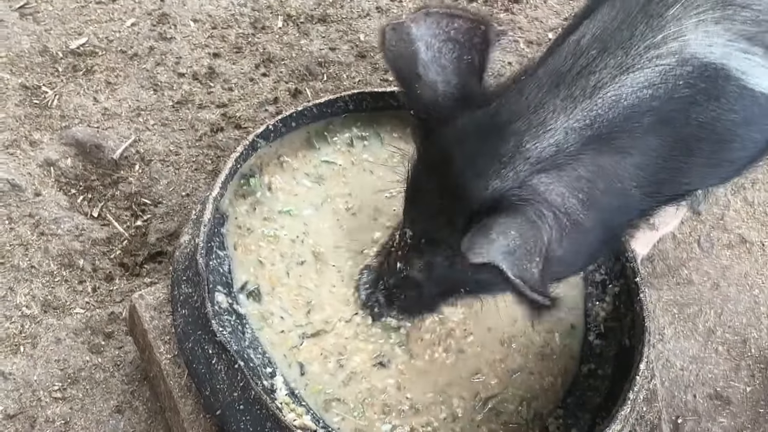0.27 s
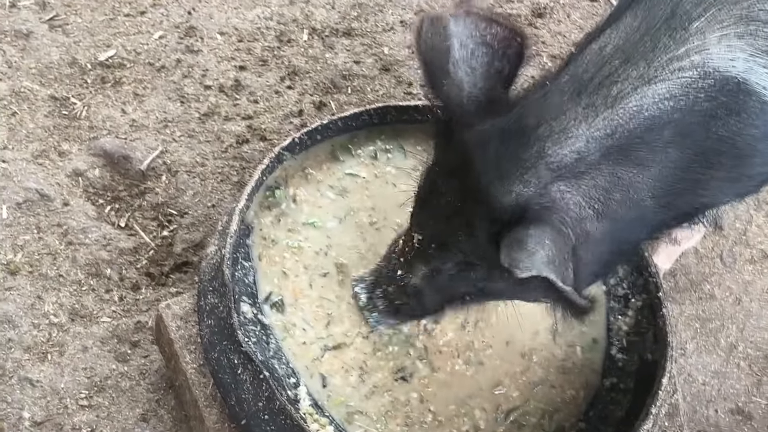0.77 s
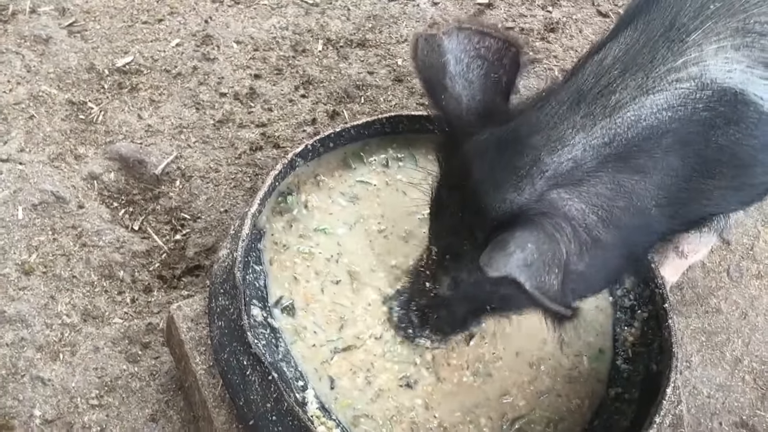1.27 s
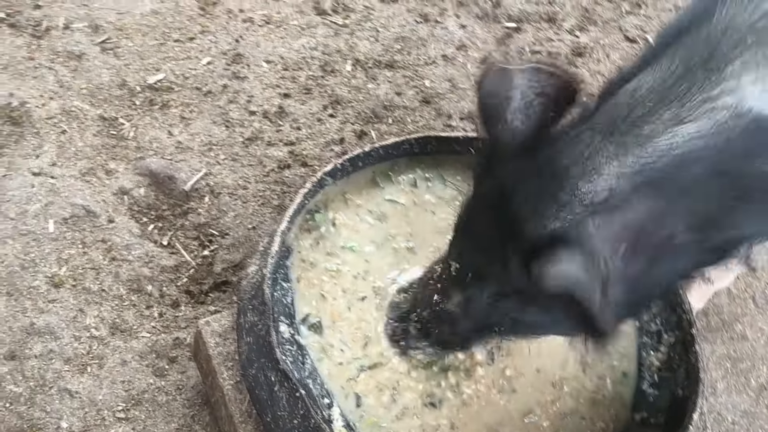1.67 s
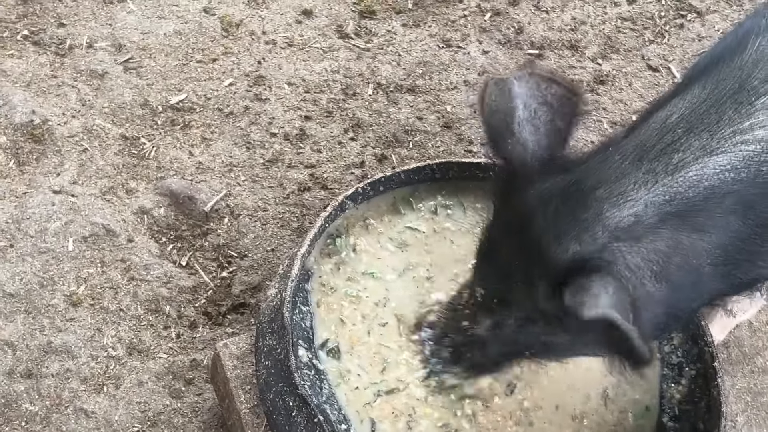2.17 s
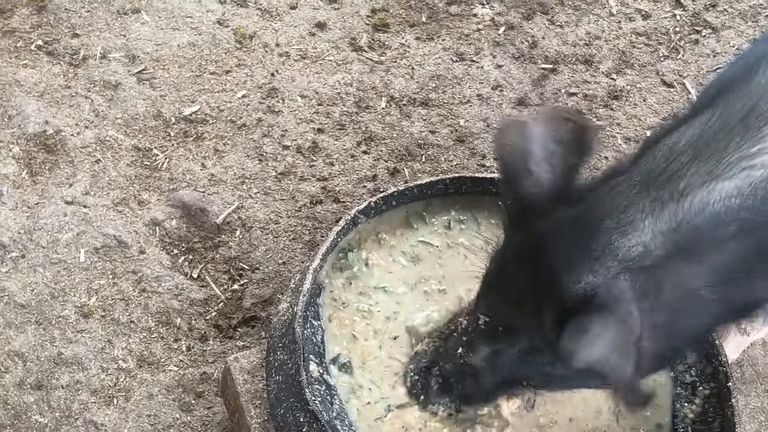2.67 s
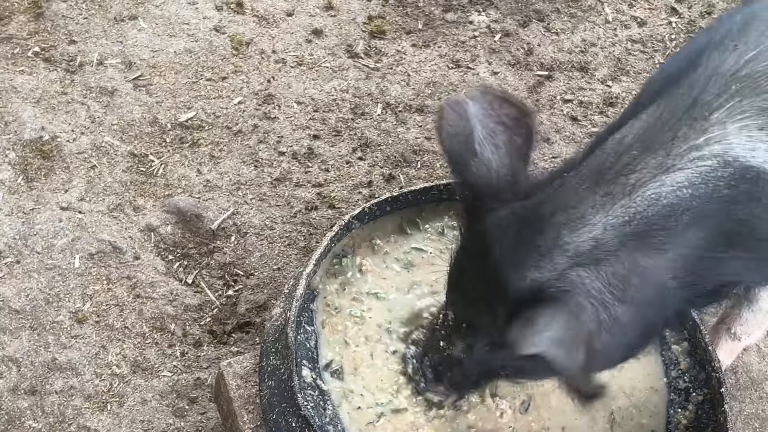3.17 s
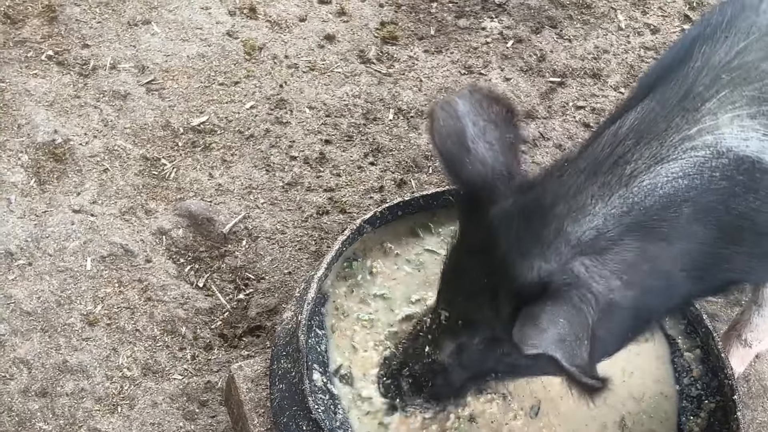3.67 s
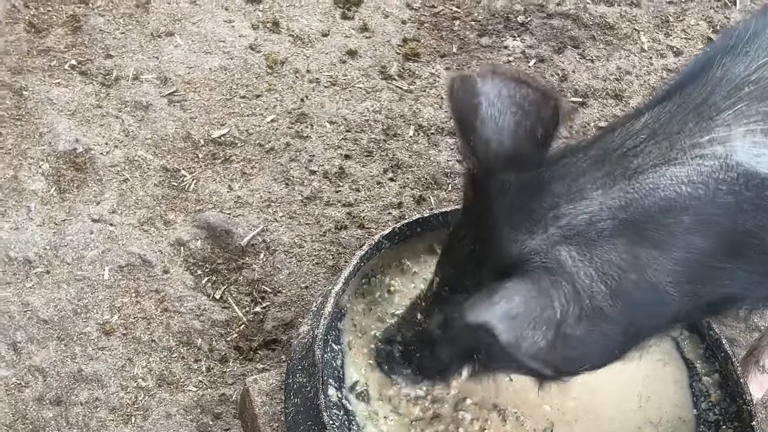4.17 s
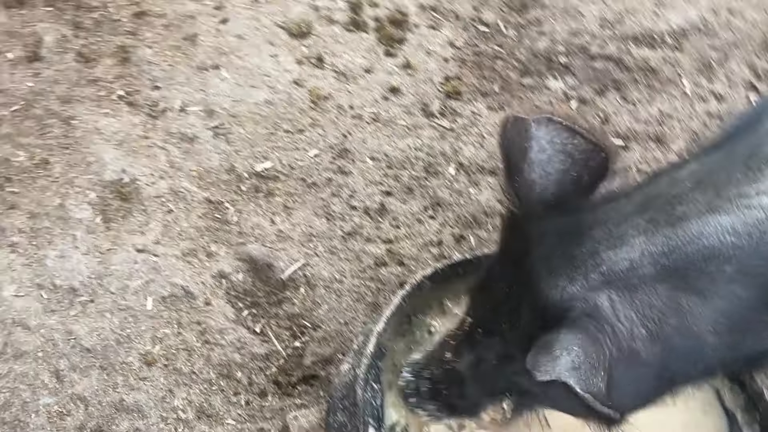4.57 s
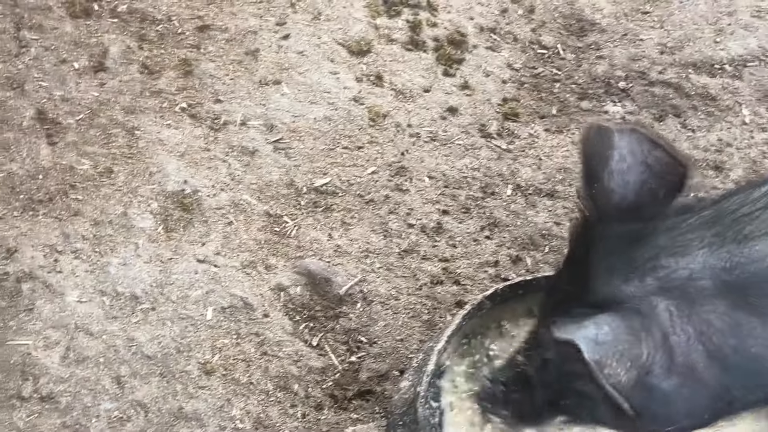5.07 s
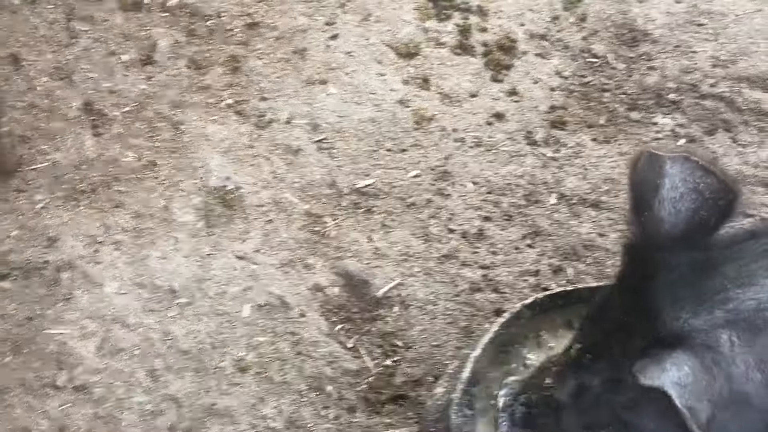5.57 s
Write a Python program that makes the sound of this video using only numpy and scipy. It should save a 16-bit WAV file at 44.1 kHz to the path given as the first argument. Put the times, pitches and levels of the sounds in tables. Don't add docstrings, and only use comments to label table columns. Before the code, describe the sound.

A pig eats soupy mash from a bowl very close to a phone microphone outdoors. About four irregular bites a second give crisp lip ticks, low glugs, bubble pops and fine fizz, strongest near 2.8 seconds. Soft slurps and liquid stirring fill the gaps. A very high cricket chirps faintly over a low, quiet farmyard wash. Later bites thin out after five seconds.

```python
import sys
import numpy as np
from scipy import signal
from scipy.fft import rfft, irfft, next_fast_len
from scipy.io import wavfile
from scipy.ndimage import uniform_filter1d

SR = 44100
rng = np.random.default_rng(int(sys.argv[2]) if len(sys.argv) > 2 else 0)


def wav_out(sig):
    wavfile.write(sys.argv[1], SR, np.round(np.clip(np.atleast_2d(sig).T, -1, 1) * 32767).astype(np.int16))


def convert_level_to_amplitude(level_db):
    exponent = np.asarray(level_db, float) / 20
    return 10 ** exponent


N = 255763


def evened(x):
    return x / np.sqrt(np.mean(x ** 2) + 1e-20)


def read(points, hz):
    f, value = np.transpose(points)
    return np.interp(np.log(hz + 1), np.log(f + 1), value)


def add(mix, s, sound):
    part = mix[max(round(s * SR), 0):][:len(sound)]
    part += sound[:len(part)]


def colour(x, points):
    size = next_fast_len(len(x))
    gain = convert_level_to_amplitude(read(points, np.fft.rfftfreq(size, 1 / SR)))
    return evened(irfft(rfft(x, size) * gain, size)[:len(x)])


def resonate(x, hz, width):
    turn = np.exp(2j * np.pi * np.cumsum(hz * np.ones(len(x))) / SR)
    r = np.exp(-np.pi * width / SR)
    return 2 * (turn * signal.lfilter([1 - r], [1, -r], x / turn)).real


def swell(u, sharp=1.4):
    return (u * np.exp(1 - u)) ** sharp


def ragged(depth_db, seconds):
    span = int(seconds * SR)
    drift = uniform_filter1d(uniform_filter1d(rng.standard_normal(N), span), span)
    return evened(convert_level_to_amplitude(depth_db * np.tanh(evened(drift))))


def lasting(rows, cycles):
    return [(s, db, hz, cycles * 1e3 / hz) for s, db, hz in rows]


def bubbles(rows, rise, glide, rough, push_db, reach, gain_db):
    out, chance = np.zeros(N), rng.standard_normal((len(rows), 4000))
    for (s, db, hz, ms), c in zip(rows, chance):
        top = rise * ms / 1000
        u = np.arange(int(min(6 * top * SR, 4000))) / SR / top
        cycle = max(int(SR / hz), 2)
        wobble = np.sqrt(cycle) * uniform_filter1d(c[:len(u) + cycle], cycle)[:len(u)]
        wobble = wobble - np.sum(swell(u) * wobble) / np.sum(swell(u))
        turns = np.cumsum(hz * (1 + glide * (np.minimum(u, 4) - 1) + rough * wobble)) / SR
        ring = swell(u, 1.82) * np.sin(2 * np.pi * turns + 9 * c[0])
        throb = np.sqrt(2 * cycle) * uniform_filter1d(c[::-1][:len(u)], 2 * cycle)
        ring = ring * convert_level_to_amplitude(14 * rough * np.tanh(throb))
        lower = 2 * np.pi * (0.72 + 0.1 * np.tanh(c[2]))
        push = convert_level_to_amplitude(push_db) * swell(turns / reach, 16) * np.sin(lower * turns + 9 * c[1])
        level = swell(u) * np.sum(ring + push) / np.sum(swell(u))
        add(out, s - top, convert_level_to_amplitude(db + gain_db) * (ring + push - level))
    return out


# loudest moment in seconds, peak in dB, pitch in Hz, length in ms.
GLUG_POCKETS = [(0.1604, -25.5, 965, 5.9), (0.1669, -23.5, 633, 5.5), (0.8355, -25.5, 690, 1.7),
                (0.8483, -20, 900, 1.36), (1.4527, -27.5, 756, 2.95), (1.4578, -28, 590, 2.3),
                (1.6566, -22.5, 800, 3.34), (1.8667, -29, 820, 2.95), (1.8732, -34.5, 587, 5.8),
                (2.1442, -22, 776, 2.6), (2.1505, -27, 876, 6), (2.437, -24, 667, 1),
                (2.4541, -30.5, 717, 8), (2.5712, -31, 850, 3.2), (2.5876, -35, 710, 3.6),
                (2.6366, -22, 542, 3.9), (2.6482, -27.5, 787, 5.6), (2.794, -32, 890, 6.6),
                (2.8379, -21, 786, 5.1), (2.8484, -19.5, 588, 8.2), (3.1137, -36, 670, 12.5),
                (3.3469, -23.5, 674, 2), (3.5679, -26.5, 696, 3.46), (3.7714, -19, 565, 3.06),
                (4.0042, -29, 690, 4.8), (4.0185, -30, 408, 4.3), (4.2369, -31, 647, 4.9),
                (4.6563, -37, 650, 5.2), (4.8464, -36.5, 475, 4.2), (5.0104, -24.5, 492, 3.7)]


def glugs():
    pockets = bubbles(GLUG_POCKETS, rise=.595, glide=.022, rough=.21, push_db=-14.5, reach=2.83, gain_db=1)
    return signal.sosfilt(signal.butter(2, 190, "high", fs=SR, output="sos"), pockets)


# loudest moment in seconds, peak in dB, pitch in Hz.
SWALLOWS = [(0.642, -45, 159), (0.8813, -45.5, 170), (1.468, -47, 169), (1.606, -52, 96),
            (1.4632, -31, 600), (1.6628, -33.5, 630), (1.8177, -34, 990), (2.9453, -43, 166),
            (3.1492, -34.5, 640), (3.25, -45, 194), (4.1306, -41.5, 148), (4.17, -45, 115),
            (4.1861, -30, 930), (4.3976, -33.5, 900), (4.6378, -34.5, 690), (5.128, -39.5, 467),
            (5.2626, -44, 125)]


def gulps():
    return bubbles(lasting(SWALLOWS, 2.03), rise=.554, glide=-.04, rough=.15, push_db=-10, reach=2.4,
                   gain_db=-.5)


# loudest moment in seconds, peak in dB, pitch in Hz, length in ms.
SMALL_POPS = [(0.1709, -27, 2720, 1.6), (0.3936, -29.5, 2900, 3.4), (0.3937, -30.5, 3560, 4.5),
              (1.0783, -29, 1650, 4.34), (1.3946, -24.5, 2680, 1.3), (1.5873, -29.5, 3380, 1.5),
              (2.0829, -36, 3260, 1.4), (2.0854, -25.5, 1450, 1.15), (2.1453, -32, 3440, 4.9),
              (2.3739, -34.5, 1820, 2.4), (2.5956, -31, 1390, 3.6), (2.8535, -14, 2060, 3.7),
              (3.0592, -29, 3240, 2.5), (3.1028, -35.5, 1670, 4.5), (3.508, -32, 2070, 3.3),
              (3.8063, -27.5, 3330, 1.7), (3.9496, -35, 1860, 3.6), (3.9848, -35.5, 1430, 3.7),
              (4.1749, -32.5, 3440, 2.1), (4.1778, -34.5, 2910, 3.1), (4.1963, -34.5, 3080, 2.6),
              (4.2191, -34, 1840, 2.6), (4.259, -32.5, 2670, 2.4), (4.5656, -36, 1840, 4),
              (4.944, -32, 1870, 2.45), (4.9727, -35, 1730, 3.3), (5.258, -29, 2670, 2.6),
              (5.259, -25, 1800, 2.9)]
# loudest moment in seconds, peak in dB, pitch in Hz.
TONGUE_CLICKS = [(0.1419, -29.5, 4570), (0.176, -27, 4070), (0.4278, -29.5, 4410), (1.079, -24.5, 4560),
                 (1.1512, -32.5, 4200), (1.4378, -36, 4500), (1.4451, -26.5, 4520), (1.4636, -30.5, 4570),
                 (1.6631, -20, 4160), (1.6693, -26, 4200), (1.8166, -36.5, 3900), (1.8739, -34, 4100),
                 (1.9247, -31, 3980), (2.1464, -28, 4400), (2.4519, -30.5, 4570), (2.597, -27, 4290),
                 (2.6529, -31, 4400), (2.7788, -40, 3700), (2.8379, -22.5, 4230), (2.8463, -23, 3870),
                 (3.3451, -19.5, 4260), (3.5664, -22.5, 4420), (3.5748, -23, 3940), (3.7693, -30, 3650),
                 (3.8654, -29, 3900), (4.6491, -24.5, 3660), (4.9027, -34, 4630), (4.9125, -34, 3840),
                 (5.0101, -31, 3800), (5.3293, -30, 4300)]
# loudest moment in seconds, peak in dB, pitch in Hz.
LIP_SNAPS = [(0.1607, -36, 5570), (0.1821, -28.5, 5200), (.184, -25, 9800), (0.8475, -28, 5900),
             (1.1066, -33.5, 5600), (2.4432, -31, 5570), (2.4522, -36, 5740), (2.464, -25, 7740),
             (2.8376, -27, 5740), (2.8528, -18.5, 5500), (3.2751, -36.5, 6000), (3.5668, -26.5, 5500),
             (4.6489, -24, 8850), (5.1951, -34, 4050), (5.6073, -39, 4610)]


def small_bursts():
    return SMALL_POPS + lasting(TONGUE_CLICKS, 8.75) + lasting(LIP_SNAPS, 10.2)


# loudest moment in seconds, peak in dB, pitch in Hz.
SETTLING_BLOPS = [(0.441, -41, 850), (0.7601, -40.5, 786), (1.4879, -43.0, 600), (1.5878, -39, 860),
                  (1.888, -37, 740), (1.8945, -35, 800), (2.5954, -34, 840), (2.648, -28.5, 1220),
                  (2.9304, -44, 423), (3.1708, -43, 563), (3.7735, -30.5, 410), (3.8037, -35.5, 630),
                  (4.8599, -39.5, 876), (5.1276, -44, 1200), (5.1897, -44, 860)]
# loudest moment in seconds, peak in dB, pitch in Hz.
BURSTING_DROPLETS = [(0.1174, -39, 1870), (0.1426, -33, 3040), (0.4365, -31, 3750), (0.449, -34, 2970),
                     (0.8481, -31, 4770), (0.8689, -37, 2790), (1.0997, -30, 4560), (1.1066, -29, 3960),
                     (1.4373, -33, 3530), (1.4516, -37, 5910), (1.4551, -31.5, 1770), (1.6082, -37.0, 3200),
                     (1.6635, -18.5, 3540), (1.6479, -30, 4340), (1.6695, -26, 6270), (1.8534, -43, 3430),
                     (1.8538, -33, 2070), (1.8583, -35, 5830), (1.9057, -38, 4130), (1.9302, -35, 2780),
                     (2.1348, -28, 4400), (2.443, -32, 4540), (2.5014, -42, 2070), (2.5333, -36, 2000),
                     (2.5796, -32, 3640), (2.6052, -36, 4310), (2.6099, -35, 1370), (2.6351, -37, 4250),
                     (2.6355, -45, 2500), (2.656, -36, 3040), (2.7267, -33.5, 3670), (2.8381, -24, 2950),
                     (2.864, -27, 3960), (3.0614, -36.0, 1810), (3.1059, -31, 6400), (3.1258, -35, 1680),
                     (3.1405, -37.0, 5170), (3.4982, -35, 3620), (3.5474, -35, 3200), (3.577, -29.5, 3100),
                     (3.7595, -32, 3680), (3.939, -34, 2990), (4.1662, -34, 3330), (4.2335, -42, 2760),
                     (4.6375, -28, 3300), (4.9054, -32, 2640), (5.028, -36.0, 3960), (5.0304, -34, 1940)]
# loudest moment in seconds, peak in dB, pitch in Hz.
SPIT_THREADS = [(0.1419, -36, 6980), (0.1558, -37, 7580), (0.1634, -34.0, 8010), (0.1711, -28.0, 8100),
                (0.1841, -24, 10900), (0.4279, -32, 7030), (0.4368, -32.0, 11970), (0.4377, -42, 8010),
                (0.823, -34, 6900), (1.0772, -34, 10510), (1.0959, -33, 8270), (1.4522, -28, 7400),
                (1.5869, -28, 14210), (1.5869, -28.5, 7140), (1.6553, -25, 7320), (1.6561, -30, 11020),
                (2.1346, -28.0, 10000), (2.398, -33, 8700), (2.4424, -28.0, 7440), (2.4709, -38, 7550),
                (2.6355, -29, 10940), (2.8412, -32.0, 13700), (3.1026, -34, 8360), (3.1107, -32, 6600),
                (3.5668, -24, 12830), (3.5724, -21.5, 11100), (3.7705, -26, 14600), (3.8661, -29.5, 8100),
                (3.9831, -30, 7920), (4.2402, -30, 9500), (4.6375, -26, 9550), (4.9032, -34, 10160),
                (5.0084, -36, 9700)]


def fine_bursts():
    return lasting(SETTLING_BLOPS, 4.06) + lasting(BURSTING_DROPLETS, 6.72) + lasting(SPIT_THREADS, 13)


# start in seconds, peak in dB, length in ms, level of the top octave in dB.
LIP_TICKS = [(0.1702, -22, 1, 1), (0.1814, -33, 1.8, -10), (0.4267, -17, 2.9, 5), (1.0763, -20, 1.1, -6),
             (1.4363, -24, 1.4, -7), (1.4432, -20.5, 1, -21), (1.5863, -22, 0.29, -31),
             (1.6527, -25, 6.3, 1), (1.6685, -25, 2.6, -21), (1.8574, -24.5, 1.1, 2), (2.1333, -22, 1.5, 1),
             (2.1442, -25, 1.9, 0), (2.4405, -28, 1.6, -8), (2.6305, -22, 1, -3), (2.634, -21.5, 1.5, -1),
             (2.8357, -20.5, 1.6, -16), (2.8372, -31, 0.64, -8), (2.845, -25, 2.3, -12),
             (3.1048, -32, 0.8, -17), (3.344, -16.5, 2.8, -0.5), (3.5656, -24, 1.15, 12),
             (3.571, -25, 2.2, 3), (3.769, -19.5, 2.3, -4), (3.8652, -39, 1.7, -23),
             (3.9825, -30, 2.1, -25), (4.227, -17.5, 2.2, 9), (4.2596, -22.5, 3.3, -8),
             (4.6487, -25, 0.64, -14)]
# start in seconds, peak in dB.
SPIT_FLECKS = [(0.1417, -37), (0.8217, -32), (1.139, -29), (1.928, -35), (2.397, -33), (3.0442, -32),
               (4.5324, -33), (4.9023, -36.5), (5.01, -30), (5.2326, -37), (5.6053, -32)]


def ticks():
    out, t = np.zeros(N), np.arange(700) / SR
    fleck_ms, fleck_top_db = 1.6, -12
    rows = LIP_TICKS + [(s, db, fleck_ms, fleck_top_db) for s, db in SPIT_FLECKS]
    for (s, db, ms, top_db), c in zip(rows, rng.standard_normal((len(rows), 700))):
        # (Hz, dB)
        tone = [(300, -67), (1500, -38), (3000, -19), (6000, 1), (10000, 2.5), (12500, top_db), (16000, top_db)]
        add(out, s, convert_level_to_amplitude(db - 4.5) * swell(t / (0.00046 * ms)) * colour(c, tone))
    return out


# pitch in Hz, level in dB.
MOUTH_CAVITIES = [(2050, -2), (3500, -8), (4330, 0), (5400, -8), (7400, -6)]


def mouth(x):
    width_hz = 230
    return x + sum(convert_level_to_amplitude(db) * resonate(x, hz, width_hz) for hz, db in MOUTH_CAVITIES)


# pitch in Hz, seconds to fall by 60 dB.
AFTER_RING = [(300, 0.072), (2000, 0.08), (15000, 0.097)]


def splatter(x):
    taps = rng.choice([-1., 1.], 6000) * (rng.random(6000) < .08)
    hz, t, z = signal.stft(taps, SR, nperseg=128)
    fade = convert_level_to_amplitude(-60 * t / read(AFTER_RING, hz)[:, None])
    tail = signal.istft(z * fade, SR, nperseg=128)[1]
    delayed = np.r_[np.zeros(90), tail / np.linalg.norm(tail)]
    return convert_level_to_amplitude(-10) * signal.oaconvolve(x, delayed)[:N]


def grains(tone, per_s, spread_db, cycles, count):
    out = np.zeros(N)
    size = convert_level_to_amplitude(spread_db * np.minimum(rng.exponential(1, N), 4.5)) * (rng.random(N) < per_s / SR)
    kind = rng.integers(0, count, N)
    for k, hz in enumerate(np.geomspace(tone[0][0], tone[-1][0], count)):
        turns = np.arange(int(8 * cycles * SR / hz)) * hz / SR
        grain = swell(2 * turns / cycles) * np.sin(2 * np.pi * turns * (1 + 0.0205 * turns))
        grain = grain / np.linalg.norm(grain)
        out += convert_level_to_amplitude(read(tone, hz)) * np.sqrt(hz) * signal.oaconvolve(size * (kind == k), grain)[:N]
    return evened(out)


# centre in seconds, length in ms, squelch in dB, spray in dB.
JAW_BITES = [(0.142, 17, -41.5, -48), (0.171, 38, -42.5, -49), (0.439, 28, -44, -52),
             (0.8355, 5.3, -43, -44), (1.08, 13, -39.5, -46), (1.102, 26, -51, -52),
             (1.457, 24.3, -39, -46), (1.593, 18, -40.5, -59), (1.618, 27, -44, -51),
             (1.662, 29.5, -37, -46.5), (2.1485, 45, -37, -50.5), (2.452, 48, -41, -45.5),
             (2.604, 32, -44, -49.5), (2.643, 30, -35.5, -52), (2.844, 11.2, -29.5, -34.5),
             (3.109, 38, -46, -46.5), (3.291, 48, -53, -55), (3.3545, 35, -41, -49.5),
             (3.55, 29, -45.5, -48.5), (3.568, 18, -40.5, -44), (3.773, 12.4, -32, -48),
             (3.936, 58, -48, -56), (3.991, 33, -42.5, -53), (4.013, 62, -51, -59), (4.182, 35, -48, -54),
             (4.235, 26, -40, -47), (4.262, 13.6, -35, -51), (4.648, 79, -46, -55.5), (5.014, 21, -39, -53),
             (5.611, 18, -49, -54)]
# centre in seconds, length in ms, squelch in dB.
TONGUE_SLURPS = [(0.1, 37, -49.5), (2.52, 49, -48.5), (0.33, 72, -53.5), (0.394, 18.6, -39.5),
                 (0.761, 41, -50.5), (0.857, 34, -45), (1.151, 28, -43.5), (1.397, 9, -40), (1.83, 36, -45),
                 (1.8695, 33, -42), (1.922, 24, -43), (2.09, 20, -42.5), (2.374, 18, -48), (2.576, 20, -42),
                 (2.79, 24, -45.5), (2.828, 14, -38), (2.87, 23, -43.5), (3.062, 21, -48),
                 (3.144, 21, -40.5), (3.506, 30, -42), (3.805, 31, -44.5), (3.865, 10.4, -39),
                 (4.389, 11, -48), (4.549, 43, -49.5), (4.909, 18, -45), (4.946, 13, -47.5),
                 (4.979, 19, -48), (5.191, 23, -53), (5.262, 13, -46), (5.32, 72, -48)]
# time in seconds, level in dB.
BOWL_STIR = [
    (0, -46),
    (.6, -48),
    (1.3, -38),
    (2.5, -45.5),
    (4.1, -43),
    (5.3, -36),
    (5.8, -37.5),
]
# pitch in Hz, level in dB.
SLOSH_TONE = [(200, -4), (600, -0.5), (1200, -0.5), (1950, 0.5), (3000, -1), (4300, -8), (6000, -12.5)]
# pitch in Hz, level in dB.
FIZZ_TONE = [(3500, -11.5), (5000, 2), (7000, 1.5), (10000, 0), (13000, -3), (16000, -37)]


def mash():
    squelch, spray = np.zeros((2, N))
    slurp_spray_db = -13
    slurps = [(s, ms, db, db + slurp_spray_db) for s, ms, db in TONGUE_SLURPS]
    for s, ms, squelch_db, spray_db in JAW_BITES + slurps:
        u = np.arange(int(3 * ms * SR / 1000)) / SR * 1000 / ms
        clump = (1 - np.exp(-u / .05)) * (np.exp(-u ** 2) + .2 * np.exp(-u))
        start = s - ms / 2000
        add(squelch, start, convert_level_to_amplitude(squelch_db - 1) * clump)
        add(spray, start, convert_level_to_amplitude(spray_db + 6) * clump)
    stir = convert_level_to_amplitude(np.interp(np.arange(N) / SR, *np.transpose(BOWL_STIR)) - 18.5)
    stir = stir * ragged(5.5, .03)
    slosh = grains(SLOSH_TONE, per_s=6000, spread_db=2.3, cycles=6, count=24)
    fizz = grains(FIZZ_TONE, per_s=6000, spread_db=2.5, cycles=5, count=16)
    sputter_db, sputter_s = 3.6, .002
    wet = ragged(sputter_db, 2 * sputter_s) * slosh
    fine = ragged(sputter_db, sputter_s) * fizz
    return mouth((squelch + stir) * wet + (spray + convert_level_to_amplitude(-4.5) * stir) * fine)


def froth(rows):
    chance = rng.random((len(rows), 3, 3))
    s, db, hz, ms = np.transpose(rows)[:, :, None]
    late, weak, off = chance.T.transpose(0, 2, 1)
    delay = .02 * late ** 1.2
    pitch = hz * (1 + .3 * (off - .5))
    brood = [s + delay, db - 10 - 7 * weak, pitch, ms * (1 - .5 * weak)]
    brood = np.reshape(brood, (len(brood), -1)).T
    return bubbles(brood, rise=.4, glide=.03, rough=.08, push_db=-8, reach=3, gain_db=0)


# loudest
# moment in seconds, peak in dB, pitch in Hz.
FAINT_DRIPS = [(0.0033, -37, 4540), (0.0963, -35.5, 4940), (0.1558, -30, 15160), (0.173, -25.5, 680),
               (0.3681, -39, 2810), (0.6973, -41, 3300), (0.7517, -36, 8650), (1.0792, -38, 880),
               (1.6305, -38, 4480), (1.6464, -29, 8610), (1.6691, -37.0, 14360), (1.8556, -33, 8960),
               (1.875, -32, 12400), (2.0668, -36, 4190), (2.138, -31.5, 600), (2.354, -38, 4190),
               (2.376, -33, 4850), (2.4167, -40, 12520), (2.4167, -37.0, 8500), (2.454, -47, 169),
               (2.6372, -34, 427), (2.802, -37, 7350), (3.2018, -40, 2180), (3.3057, -38.5, 1500),
               (3.3125, -35, 14360), (3.3127, -36.0, 3900), (3.329, -34, 6430), (3.3328, -38, 8960),
               (3.336, -33, 1680), (3.5376, -36, 8730), (3.676, -39, 2000), (3.9565, -32, 10110),
               (3.9605, -35, 3650), (3.9648, -37.0, 1950), (3.9833, -41, 3680), (3.981, -34, 850),
               (4.0115, -34, 820), (4.028, -37, 474), (4.092, -40, 3100), (4.22, -33, 9650),
               (4.3811, -36, 2070), (4.4528, -45.5, 520), (4.5343, -37.5, 3040), (4.9768, -35, 4540),
               (5.009, -37, 400), (5.18, -38, 4250), (5.228, -38.0, 1720), (5.2332, -32, 14360),
               (5.5309, -37.5, 4420), (5.5773, -38.5, 1780), (5.6238, -35, 9420), (5.704, -34.5, 9000)]


def drips():
    ms_at_1k, shrink = 4.6, .7
    rows = [(s, db, hz, ms_at_1k * (1e3 / hz) ** shrink) for s, db, hz in FAINT_DRIPS]
    return bubbles(rows, rise=.6, glide=.02, rough=.07, push_db=-12, reach=3, gain_db=0)


def cricket(rows, strokes_hz, start_hz, end_hz, width, smear):
    out = np.zeros(N)
    for start, end, db in rows:
        t = np.arange(int((end - start) * SR)) / SR
        noise, pace = rng.standard_normal(len(t)), rng.uniform(.993, 1.007)
        climb = .5 + .5 * np.tanh((t - .045) / .035)
        step = (end_hz - start_hz) * np.clip((db + 60) / 10, .3, 1)
        stroke = swell((t * strokes_hz * pace) % 1 / .03)
        scrape = stroke * np.cos(2 * np.pi * (start_hz + end_hz) / 2 * pace * t) + smear * noise
        rising_hz = end_hz - step * (1 - climb)
        low = resonate(resonate(scrape, start_hz, width), start_hz, 2 * width)
        high = resonate(resonate(scrape, rising_hz, width), rising_hz, 2 * width)
        wing = .4 * evened(low) + evened(high)
        edges = signal.windows.tukey(len(t), min(.02 / (end - start), 1))
        add(out, start, convert_level_to_amplitude(db - 6 * (1 - climb)) * evened(wing) * edges)
    return out


# start in seconds, level in dB.
NEAR_CHIRPS = [(0, -51.5), (.19, -54.5), (.42, -55), (.64, -55), (.88, -52), (1.71, -60), (1.88, -52),
               (2.063, -48.5), (2.265, -50.5), (2.49, -49.5), (2.69, -49), (2.905, -50.5), (3.13, -50),
               (3.397, -49.5), (3.62, -49.5), (3.861, -50.5), (4.1, -50.5), (4.341, -50), (4.68, -56.5),
               (4.85, -56.5), (5.07, -57), (5.249, -54.5), (5.48, -52.5), (5.68, -51.5)]


def near_cricket():
    chirp_s, rest_s = .17, .05
    start, db = np.transpose(NEAR_CHIRPS)
    length = chirp_s - .012 * np.clip(-53 - db, 0, 4)
    room = np.diff(start, append=start[-1] + 1) - rest_s
    rows = zip(start, start + np.minimum(room, length), db)
    return cricket(rows, strokes_hz=111, start_hz=11060, end_hz=11440, width=340, smear=.5)


# start in seconds, end in seconds, level in dB.
FAR_RASPS = [
    (0, 1.04, -65),
    (2.3, 2.6, -64),
    (3.88, 4.65, -60),
    (5.25, 5.8, -64),
]
# start in seconds, end in seconds, level in dB.
STEADY_RASP = [
    (0, .9, -62),
]


def far_crickets():
    far = cricket(FAR_RASPS, strokes_hz=105, start_hz=10700, end_hz=10800, width=500, smear=1.2)
    steady = cricket(STEADY_RASP, strokes_hz=112, start_hz=11400, end_hz=11400, width=450, smear=1.3)
    return far + steady


# pitch in Hz, level in dB per Hz.
YARD_TONE = [(24, -44), (40, -2), (115, 0.5), (190, -1), (859, 1.5), (2010, -0.5), (10500, -10.5),
             (15500, -16)]


def yard():
    yard_db, drone_hz, drone_db = -42.5, 117, -1
    frames, hz = N // 256 + 5, np.fft.rfftfreq(1024, 1 / SR)
    a, b, patches = rng.standard_normal((frames, 513, 3)).T
    patches = evened(uniform_filter1d(uniform_filter1d(patches, 10, 0), 12, 1))
    patches_db = 1.8 * patches * np.minimum(hz / 500, 1)[:, None]
    z = (a + 1j * b) * convert_level_to_amplitude(read(YARD_TONE, hz)[:, None] + patches_db)
    wash = evened(signal.istft(z, nperseg=1024, noverlap=768)[1][:N])
    return convert_level_to_amplitude(yard_db - 5.5) * (wash + convert_level_to_amplitude(drone_db) * resonate(wash, drone_hz, 9.5))


def scene():
    small, fine = small_bursts(), fine_bursts()
    smacks = glugs() + gulps() + mouth(ticks())
    smacks += bubbles(small, rise=.6, glide=.02, rough=.06, push_db=-8, reach=3, gain_db=2)
    smacks += bubbles(fine, rise=.6, glide=.02, rough=.05, push_db=-14, reach=3, gain_db=0)
    pig = smacks + splatter(smacks) + mash() + froth(small + fine) + drips()
    return (pig + near_cricket() + far_crickets() + yard())[None]


def low_pass(x):
    return signal.sosfilt(signal.butter(12, 17130, fs=SR, output="sos"), x)


def record(dry):
    bass_cut = signal.sosfilt(signal.butter(6, 62, "high", fs=SR, output="sos"), dry)
    band_limit = signal.firwin(801, 15850, window=("kaiser", 8), fs=SR)
    limited = signal.oaconvolve(bass_cut, band_limit[None], "same")
    return low_pass(limited)


dry = scene()
out = record(dry)
wav_out(out)
```